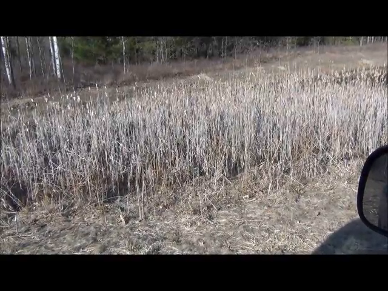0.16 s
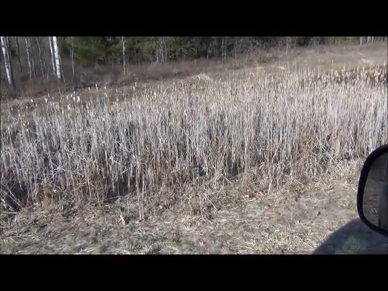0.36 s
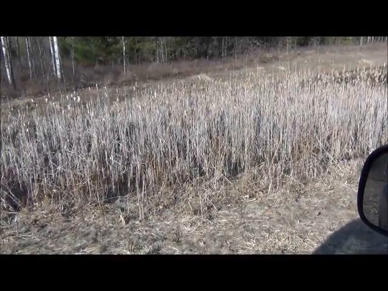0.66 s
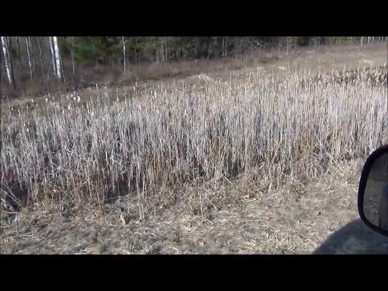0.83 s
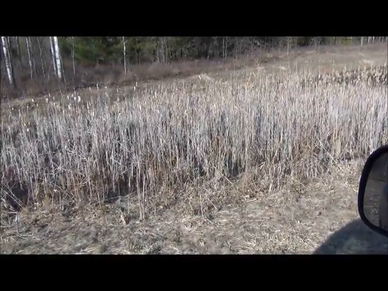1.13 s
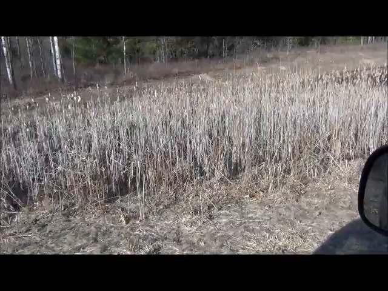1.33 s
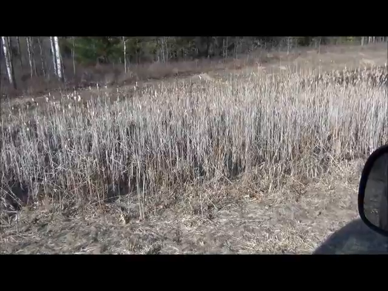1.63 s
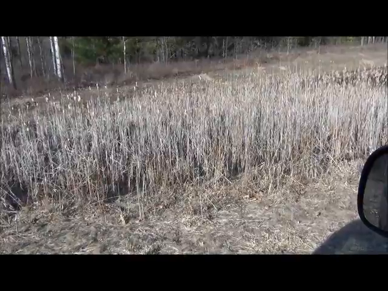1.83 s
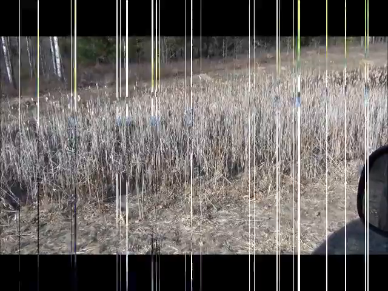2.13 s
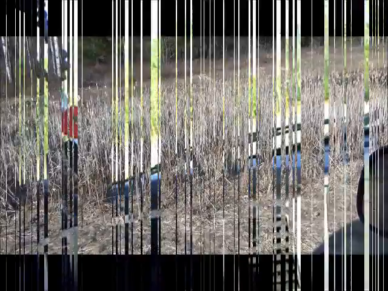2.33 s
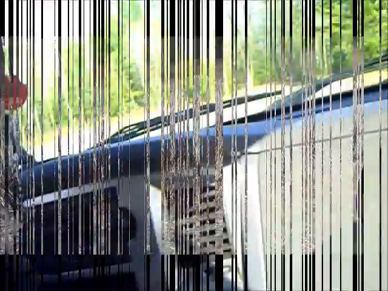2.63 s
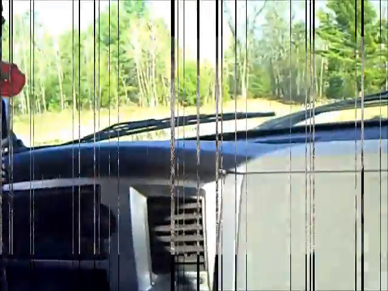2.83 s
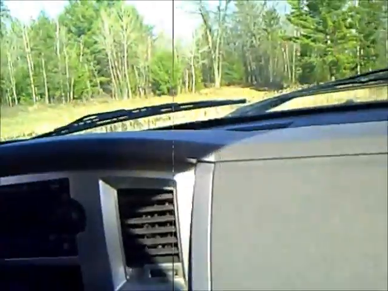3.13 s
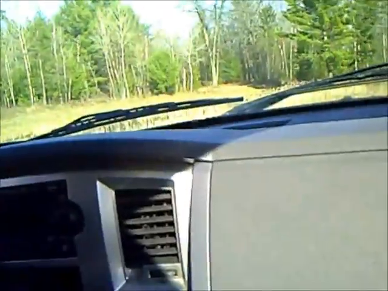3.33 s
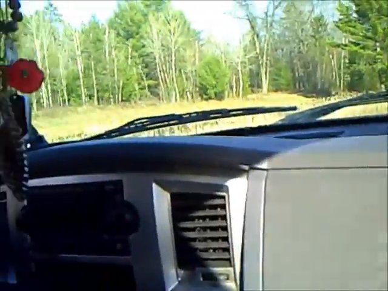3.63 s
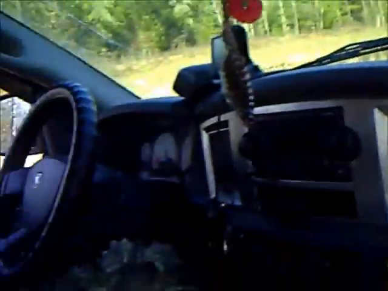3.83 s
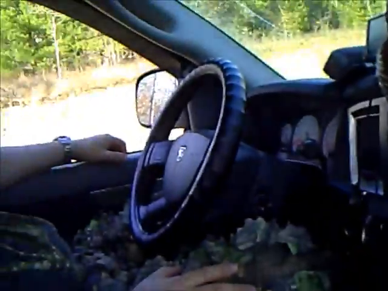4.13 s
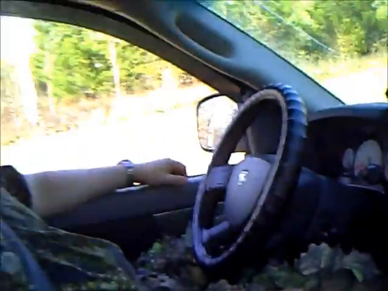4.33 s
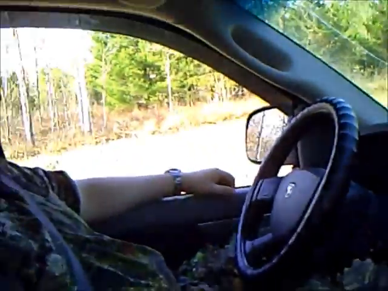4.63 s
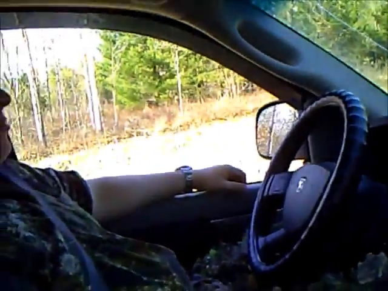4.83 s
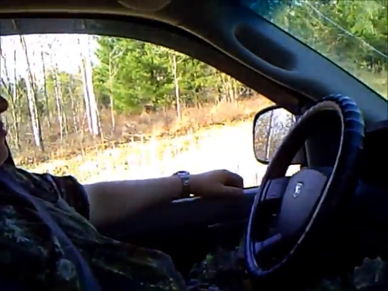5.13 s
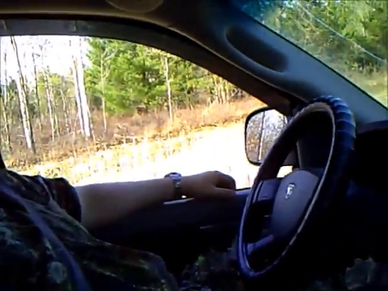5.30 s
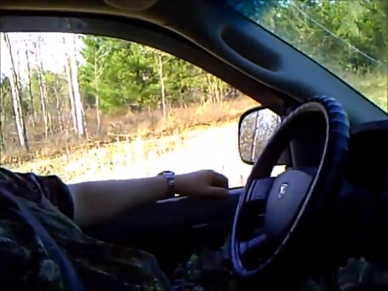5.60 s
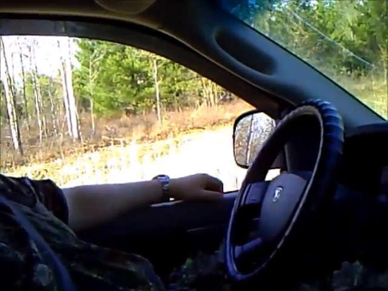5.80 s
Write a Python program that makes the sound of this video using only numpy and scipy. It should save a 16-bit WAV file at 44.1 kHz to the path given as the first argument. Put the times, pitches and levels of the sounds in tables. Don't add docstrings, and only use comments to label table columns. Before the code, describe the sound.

Many small frogs whistle upward and trill, bright and near, with slight reverberation from reeds. A second, duller microphone thumps on midway, adding cloth swish and case knocks under the frogs. A tiny sharp snap precedes a sudden cut; then only distant frogs remain, much quieter, centred and slightly fluttering with brief dropouts, over soft cab rumble, faint knocks and irregular light handling ticks.

```python
import sys
import numpy as np
from scipy import signal
from scipy.fft import rfft, irfft, next_fast_len
from scipy.io import wavfile
from scipy.ndimage import uniform_filter1d

SR = 44100
rng = np.random.default_rng(int(sys.argv[2]) if len(sys.argv) > 2 else 0)


def int16_out(signal):
    q = np.round(np.clip(np.atleast_2d(signal).T, -1, 1) * 32767)
    wavfile.write(sys.argv[1], SR, q.astype(np.int16))


def makeup_ratio(level_db):
    decades = np.asarray(level_db, float) / 20
    return 10 ** decades


N = 262924
CAB_ON, OUTDOOR_OFF = 1.8632, 3.357
BEND = .85
PORTS = np.array([[1], [-1]])

# (multiple of the loudest partial, level [dB])
PEEP_VOICE = [(.5, -32.5), (1, 1.5), (1.5, -31.5), (2, -40.5), (2.5, -50.5), (3, -54.5), (4, -55.5),
              (4.5, -56)]
LOW_VOICE = [(1, 1), (2, -41.5)]
TRILL_VOICE = [(.5, -33), (1, 2), (1.5, -30.5), (2, -41), (2.5, -48.5), (3, -48)]


def noise(points, lo_hz, hi_hz):
    size = next_fast_len(N)
    hz = np.fft.rfftfreq(size, 1 / SR)
    at, db = np.transpose(points)
    shape = makeup_ratio(np.interp(np.log(hz + 1), np.log(at), db)) * (hz > at[0] / 2)
    inside = (hz > lo_hz) & (hz < hi_hz)
    rms = np.sqrt(np.sum(shape[inside] ** 2) / len(hz))
    return irfft(rfft(rng.standard_normal(size)) * shape, size)[:N] / rms


def curve(table, column):
    rows = np.array(table)
    return makeup_ratio(np.interp(np.arange(N) / SR, rows[:, 0], rows[:, column]))


def walk(rate):
    k = int(SR / rate)
    steps = np.repeat(rng.standard_normal(N // k + 1), k)
    return 1.2 * uniform_filter1d(steps, k)[:N]


def add(out, at, sound):
    i = int(at * SR)
    i, sound = max(i, 0), sound[..., max(-i, 0):]
    out[..., i:i + sound.shape[-1]] += sound[..., :max(N - i, 0)]


def whistle(out, at, length, hz0, hz1, db, pan_db, voice, rise=0.006, fall=0.0035, bend=BEND,
            flick_hz=0., hook_hz=0., flutter_db=3.0):
    t = np.arange(int((length + rise) * SR)) / SR
    end = t[-1]
    wobble, start = rng.standard_normal((3, 10)), rng.random()
    flutter, waver, rasp = (np.interp(t, np.linspace(0, end, 10), w) for w in wobble)
    swell = np.clip(np.minimum(t / rise, (end - t) / fall), 0, 1)
    swell = swell * makeup_ratio(flutter_db * flutter - 1.5 * (t / end - .5))
    hz = hz0 + (hz1 - hz0) * (t / end) ** bend + 7 * waver
    hz = hz + flick_hz * np.exp((t - end) / 0.0031) + hook_hz * np.exp(-t / 0.01)
    turns = start + np.cumsum(hz) / SR + PORTS * pan_db * 0.0072
    tone = 0
    for (k, g), tint in zip(voice, rng.standard_normal(8)):
        partial_db = g + (k != 1) * (2.4 * tint + 2.0 * rasp)
        tone = tone + makeup_ratio(partial_db) * np.sin(2 * np.pi * k * turns)
    tick_hz = 1900 + 250 * wobble[0, 0]
    tick = makeup_ratio(-15.0) * np.exp((t - end + fall / 2) / 0.00095) * np.sin(2 * np.pi * tick_hz * t)
    add(out, at - rise / 2, np.sqrt(2) * makeup_ratio(db + PORTS * pan_db / 2) * swell * (tone + tick))


def peeps(frogs, flutter_db):
    out = np.zeros((2, N))
    for (hz, climb, *place), calls in frogs:
        pan_db, bright_db = (*place, 0, 0)[:2]
        low, steep = hz < 2500, climb > 5000
        bend = .55 if hz > 3330 and climb < 6660 else BEND
        voice = LOW_VOICE if low else [(k, db + bright_db * (k > 1)) for k, db in PEEP_VOICE]
        for at, length, db in calls:
            whistle(out, at, length, hz, hz + climb * length, db, pan_db, voice,
                    flick_hz=320 * steep, hook_hz=120 * low, flutter_db=flutter_db, bend=bend)
    return out


def trills():
    # (time [s], notes [count], first gap [s], last gap [s], start [Hz], end [Hz])
    trains = [
        (0.123, 15, .0195, .036, 2400, 2880),
        (1.335, 20, .019, .033, 2505, 2915),
        (3.086, 10, .018, .024, 2580, 2780),
        (.51, 9, 0.018, .028, 2900, 3100),
        (.082, 7, .02, .022, 2690, 2850),
        (2.595, 4, .018, .02, 3130, 3250),
    ]
    # (first level [dB], last level [dB], lateness of slowing [exponent], lateness of climb [exponent])
    shapes = [(-45, -28, 2.2, 1.3), (-46, -35, 1.9, .9), (-42, -39.5, 1.5, .9), (-43, -39.5, 1.5, 1.4),
              (-41, -40, 1.1, 1.1), (-35, -39, 1.1, 1.1)]
    out = np.zeros((2, N))
    for (at, notes, gap0, gap1, hz0, hz1), (db0, db1, slowing, climbing) in zip(trains, shapes):
        for x in np.linspace(0, 1, notes):
            gap = gap0 + (gap1 - gap0) * x ** slowing
            hz = hz0 + (hz1 - hz0) * x ** climbing
            early, weak = rng.standard_normal(2)
            db = db0 + (db1 - db0) * x ** 1.55 + .7 * weak
            whistle(out, at + .0007 * early, .52 * gap, hz - 30, hz + 30, db, 1.2, TRILL_VOICE,
                    rise=0.002964, fall=0.0041)
            at += gap
    return out


def squeaks():
    # (time [s], length [s], start [Hz], end [Hz], level [dB])
    falls = [
        (0.055, 0.039, 1840, 1716, -61.5),
        (0.598, 0.043, 1835, 1743, -60),
        (1.057, 0.039, 1860, 1720, -61),
        (1.736, 0.018, 1840, 1750, -67),
        (2.326, 0.046, 1860, 1740, -61),
        (2.92, 0.047, 1874, 1720, -59),
    ]
    # (multiple of the fundamental, level [dB])
    overtones = [(1, 3.5), (2, 6), (3, -6.5), (4, -5.5), (5, -10.5), (6, -16)]
    out = np.zeros((2, N))
    for row in falls:
        whistle(out, *row, -1.2, overtones, rise=0.0026, fall=0.0058, bend=0.64, flutter_db=2.5)
    return out


def echoes(x, t60, wet_db, spread):
    t = np.arange(int(t60 * SR)) / SR
    mid, side = rng.standard_normal((2, len(t))) * makeup_ratio(-60 * t / t60) * np.clip(t / 0.0042, 0, 1)
    tail = (mid + spread * side * PORTS) / np.sqrt(np.sum(mid ** 2))
    return x + makeup_ratio(wet_db) * signal.fftconvolve(x, tail, axes=1)[:, :N]


def crowd(start, end, hz, spread_hz, wet_db, count):
    out = np.zeros((2, N))
    for u, (a, b, c, d) in zip(rng.random(count), rng.standard_normal((count, 4))):
        pitch = hz + spread_hz * np.tanh(.4 * a)
        whistle(out, start + u * (end - start), 0.0463 * np.exp(0.298 * b), pitch, pitch + 160,
                2.0 * c, 2.1 * d, PEEP_VOICE[:3])
    out = echoes(out, 0.76, wet_db, 0.1)
    return out / np.sqrt(np.mean(out ** 2) * N / SR / (end - start))


# (time [s], level [dB])
CROWD = [
    [(0.0, -27), (.7, -32), (1.2, -34.5), (1.6, -33), (2.1, -35.5), (2.7, -29.5), (3.15, -30.5),
     (3.35, -32)],
    [(3.37, -52.5), (3.67, -60.5), (4.1, -54), (4.54, -50.5), (5.0, -51), (5.4, -51), (5.96, -51)],
]


def breath(near, trilled):
    # (frequency [Hz], level [dB])
    breathy = [(1300, -12), (2000, 6), (3700, -5.5), (4600, -10), (6500, -6), (9500, -8), (11000, -21.5)]
    effort = makeup_ratio(-45.0) * np.abs(near[0]) + makeup_ratio(-54.5) * np.abs(trilled[0]) ** 0.25
    return uniform_filter1d(effort, 120) * noise(breathy, 1300, 11000)


def marsh_air():
    # (frequency [Hz], level [dB])
    outdoor = [(30, -2), (200, -8.5), (700, -8.5), (1500, -17), (2200, -8), (4500, -12), (7000, -26.5),
               (10000, -27), (12000, -25), (16000, -29.5)]
    mid = noise(outdoor, 11700, 14650)
    side = noise([(300, -24.0), (1500, -22.0), (4500, -19.5), (9000, -40.5)], 300, 9000)
    return makeup_ratio(-80.5 + 0.5 * walk(3.8)) * (mid + side * PORTS)


def snap():
    t = np.arange(N) / SR
    shape = [(8000, -13), (10000, -9), (13000, -2.0), (14300, -25), (15500, -23)]
    return makeup_ratio(-44.5 - 60 * np.abs(t - 3.247) / 0.0022) * noise(shape, 8000, 15500)


def marsh():
    deep = [
        ((2610.5, 3901.5, 0.5, -3.5), [(.491, 0.082, -30), (.953, .08, -29.5), (1.19, 0.083, -44), (1.374, .1, -31), (1.836, .08, -29), (2.342, 0.087, -29.5), (2.43, 0.108, -31.5), (2.841, .072, -30.5)]),
        ((2540, 590, -2.4), [(.865, 0.065, -50), (1.065, 0.032, -55.5), (1.135, .04, -61.5), (1.795, 0.044, -56), (2.545, 0.034, -57.5)]),
        ((2752, 3296.5, -3.5, 6.5), [(.733, .115, -45), (3, 0.02, -39), (2.2, 0.015, -47), (2.8, 0.087, -39.5)]),
        ((2715, 3200, 1.6, 1.5), [(1.267, 0.039, -33), (1.71, 0.048, -37.5), (2.625, 0.1, -49.5), (2.913, .07, -36), (3.293, 0.061, -41.5)]),
        ((2778.5, 2700, -1, 2), [(-.01, .045, -29.5), (.615, 0.134, -35.5), (1.112, .05, -47.5), (1.995, .045, -35), (2.955, .04, -37)]),
        ((2652, 2599, -3, 6), [(.745, 0.058, -46), (1.048, 0.045, -43.5), (1.14, 0.046, -56.5), (2.205, 0.03, -52)]),
    ]
    middle = [
        ((2807, 3280, 1.33, 0.73), [(.055, 0.12, -35.5), (.866, 0.08, -30.5), (1.499, 0.06, -31), (1.257, 0.072, -33), (2.165, 0.061, -34), (2.255, 0.027, -32.5), (2.287, 0.051, -37.5), (2.35, .057, -28.5), (2.429, 0.082, -30.5), (3.18, 0.051, -39.5), (3.28, .07, -30)]),
        ((2853, 2402.5, 2.5, 1.5), [(.224, .085, -33.5), (1.3, 0.091, -31), (1.765, 0.0079, -35), (3.7, 0.068, -32), (2.811, .085, -31.5)]),
        ((2850.5, 2701.5, -1, -1), [(.948, 0.071, -33), (2.736, .1, -33), (2.739, 0.069, -40)]),
        ((2885.5, 2427.5, 1.5, -2.5), [(.312, 0.054, -30), (.487, 0.091, -30), (.928, 0.033, -32), (1.35, 0.1, -30.5), (1.946, 0.062, -30), (2.01, .055, -33), (3.005, 0.031, -35)]),
        ((2990, 1900, 0.86, 1.16), [(.18, 0.1, -46), (.605, 0.055, -30.5), (.425, 0.034, -37.5), (1.04, 0.032, -46.5), (1.09, 0.014, -39), (1.165, .03, -47.5), (1.912, 0.027, -32.5), (2.2, 0.055, -46.5), (3.053, 0.07, -34)]),
    ]
    high = [
        ((2760, 5000, 1.3, 1.3), [(1.64, 0.054, -41.5), (1.786, 0.042, -32.5)]),
        ((3110, 1830, 2.5, 1.3), [(-.01, 0.029, -34), (.576, 0.018, -33), (1.84, 0.065, -47), (2.1, 0.073, -50), (.675, 0.033, -37.5), (1.958, 0.052, -38.5), (2.547, 0.075, -37), (2.961, 0.033, -38.5)]),
        ((3095, 5400, 1.8, 2.8), [(.325, 0.058, -43.5), (1.262, 0.055, -40.5), (1.89, 0.061, -38.5), (2.578, 0.07, -40), (3.208, 0.067, -37.5)]),
        ((3390.5, 3401.5, -4, 0.5), [(.242, 0.052, -49.5), (1.11, .047, -49), (1.591, 0.048, -48), (2.07, 0.053, -48), (2.555, 0.043, -48.5), (3.193, 0.034, -47)]),
        ((3230, 4300, 2.3, 9.5), [(0.12, 0.056, -54), (0.58, 0.047, -50), (1.36, 0.039, -40.5), (0.75, .045, -55.5), (.99, 0.028, -51), (1.79, 0.028, -49), (3, .03, -48), (3.175, 0.047, -41.5), (0.96, .025, -53)]),
        ((2105, -100, .5), [(.885, .087, -50.5), (2.083, 0.056, -52), (2.774, 0.055, -50.5), (2.95, 0.11, -59)]),
        ((2150, 280, .5), [(2.478, 0.024, -54), (2.512, 0.03, -55), (2.965, 0.018, -57)]),
    ]
    far = crowd(-.03, OUTDOOR_OFF, 2900, 428.7, -1.2, count=450) * curve(CROWD[0], 1) * makeup_ratio(-10)
    near, trilled = peeps(deep + middle + high, 1.9), trills() + squeaks()
    whistle(near, 0.054, 0.053, 2460, 2375, -43.0, 3.2, TRILL_VOICE)
    calls = near + trilled + far + breath(near, trilled)
    return echoes(calls, 0.97, -13, 0.4) + marsh_air() + snap()


def thump():
    out, t = np.zeros(N), np.arange(SR // 2) / SR
    kick = (1 - np.exp(-t / 0.000084)) * (np.exp(-t / 0.0032) + 0.011 * np.exp(-t / 0.011))
    rebound = 0.019 * np.exp(-t / .2) * (1 - np.exp(-t / .02))
    add(out, CAB_ON, makeup_ratio(-9.5) * (rebound - kick))
    return out


def cloth():
    # (time [s], length [s], treble [dB], low rub [dB])
    brushes = [(1.842, 0.061, -46.5, -47.5), (1.883, 0.077, -59.5, -62), (1.949, 0.15, -61.5, -62.5),
               (2.079, 0.14, -59, -61.5), (2.208, 0.087, -66.5, -72), (2.261, 0.078, -62, -62),
               (2.33, 0.11, -66.5, -63), (2.4, 0.091, -55.5, -59), (2.542, 0.087, -62.5, -61),
               (2.67, 0.11, -60, -60.5), (2.782, 0.27, -72, -67), (3.277, 0.17, -74, -75),
               (3.754, 0.27, -76, -71), (3.992, 0.22, -73, -68.5), (4.336, 0.029, -65.5, -64),
               (4.456, 0.073, -68, -65.5), (4.633, 0.054, -71.5, -68)]
    # (frequency [Hz], level [dB])
    swish_shape = [(1500, -17.5), (3000, 4), (5500, 0.5), (6300, 0), (7800, -4), (9000, -1.5),
                   (10500, -2.5), (11200, -17)]
    strokes = np.zeros((2, N))
    for at, length, treble_db, low_db in brushes:
        t = np.arange(int(length * SR)) / SR
        swell = np.clip(np.minimum(t / 0.02, (length - t) / 0.027), 0, 1)
        add(strokes, at, makeup_ratio(np.array([[treble_db], [low_db]])) * swell)
    swish = strokes[0] * makeup_ratio(-2.5 + 1.8 * walk(120) + .8 * walk(25)) * noise(swish_shape, 6500, 11000)
    fold_shape = [(6500, -23), (7300, -1.5), (8300, -1.0), (9300, -23)]
    fold = strokes[0] * makeup_ratio(-3.5 + 5.4 * walk(14)) * noise(fold_shape, 6500, 9300)
    rub_shape = [(180, -10.0), (330, 1), (600, -14.5), (1150, 4.0), (1700, 0.0), (2600, -5.0), (4000, -46.5)]
    rub = strokes[1] * makeup_ratio(3.3 * walk(40)) * noise(rub_shape, 690, 1350)
    return swish + fold + rub


def cab_air():
    # (frequency [Hz], level [dB])
    rumble = [(25, 1), (120, -10), (400, -18.5), (1000, -22.5), (1800, -26), (2300, -14.5), (4500, -32.5),
              (8000, -32.5), (11000, -36)]
    whine = makeup_ratio(-87) * noise([(8500, -40), (8660, 0), (8740, 0), (8900, -40)], 8000, 9500)
    return makeup_ratio(-67.5 + .8 * walk(8)) * noise(rumble, 21, 11000) + whine


def knocks():
    # (time [s], frequency [Hz], t60 [s], level [dB])
    hits = [
        (2.086, 920, 0.013, -37),
        (2.277, 1115, 0.016, -35.5),
        (2.903, 10300, .006, -70),
        (3.44, 700, 0.027, -50),
        (3.606, 556, 0.027, -60),
        (3.694, 910, 0.022, -58),
        (3.706, 640, 0.051, -48),
        (3.727, 745, 0.077, -53),
        (3.736, 1030, 0.052, -53),
        (3.748, 990, 0.044, -55),
    ]
    out, t = np.zeros(N), np.arange(4000) / SR
    for at, hz, t60, db in hits:
        rattle = 1 + 0.63 * uniform_filter1d(rng.standard_normal(len(t)), 24) * 5
        add(out, at, makeup_ratio(db - 60 * t / t60) * np.sin(2 * np.pi * hz * t) * rattle)
    return out


def creak():
    # (start [s], end [s], frequency [Hz], level [dB])
    start, end, hz, db = (3.225, 3.5, 312, -70.5)
    out, t = np.zeros(N), np.arange(int((end - start) * SR)) / SR
    buzz = sum(makeup_ratio(-1.5 * k) * np.sin(2 * np.pi * (k + 1) * hz * t + k * k) for k in range(4))
    swell = np.clip(np.minimum(t, t[-1] - t) / 0.027, 0, 1)
    add(out, start, makeup_ratio(db + 3 * walk(35)[:len(t)]) * swell * buzz)
    return out


def grip_ticks():
    shifts = [3.449, 3.469, 3.482, 3.565, 3.696, 3.769, 3.97, 4.068, 4.109, 4.13, 4.251, 4.34, 4.37, 4.432,
              4.468, 4.539, 4.599, 4.669, 4.735, 4.803, 4.877, 4.938, 4.983, 5.043, 5.074, 5.138, 5.202,
              5.303, 5.398, 5.539, 5.749, 5.905]
    out, t = np.zeros(N), np.arange(1200) / SR
    for at in shifts:
        grit = 1 + 0.41 * uniform_filter1d(rng.standard_normal(len(t)), 16) * 4
        push = np.exp(-((t - .006) / 0.00071) ** 2)
        overshoot = 0.5 * np.exp(-((t - .0092) / 0.0024) ** 2)
        add(out, at - .006, makeup_ratio(-48.5 + .5 * rng.standard_normal()) * (overshoot - push) * grit)
    return out


def dropouts(x):
    # (centre time [s], length [s])
    gaps = [(3.385, 0.0039), (3.4439, 0.003), (3.4745, 0.0065), (3.5652, 0.0098), (3.567, 0.0027),
            (3.756, 0.0039), (3.778, 0.0068), (3.8218, 0.0053), (3.865, 0.0053), (3.948, 0.0093),
            (4.052, 0.0022), (4.0857, 0.0029), (4.157, 0.0079), (4.286, 0.0071), (4.3782, 0.006),
            (4.387, 0.0073), (4.561, 0.0027), (4.643, 0.0038), (4.779, 0.0037), (4.877, 0.0079),
            (4.892, 0.0047), (4.9054, 0.0028), (4.958, 0.005), (4.986, 0.005), (5.0176, 0.0036),
            (5.046, 0.0041), (5.116, 0.0025), (5.1995, 0.004), (5.2271, 0.0052), (5.349, 0.0046),
            (5.417, 0.0033), (5.433, 0.0022), (5.7226, 0.0025), (5.7633, 0.0026), (5.8445, 0.0064),
            (5.873, 0.003), (5.935, 0.0023)]
    t, gain = np.arange(N) / SR, makeup_ratio(2 * walk(170))
    for at, length in gaps:
        gain = np.where(np.abs(t - at) < length / 2, makeup_ratio(-34), gain)
    band, low = (signal.sosfiltfilt(signal.butter(4, hz, "bandpass", fs=SR, output="sos"), x)
                 for hz in ((2580, 3750), (2300, 2560)))
    return x + (uniform_filter1d(gain, size=40) - 1) * band + (makeup_ratio(2.5 * walk(82)) - 1) * low


def cab_chorus():
    # frogs, each ((start [Hz], climb [Hz/s]), calls (time [s], length [s], level [dB]))
    deep = [
        ((2340, 190), [(3.959, 0.018, -57), (4.016, 0.046, -54.5), (4.41, 0.024, -55), (4.445, 0.014, -59), (4.468, 0.027, -55), (4.873, 0.079, -53.5), (5.446, 0.075, -51)]),
        ((2400, 160), [(4.066, 0.016, -72.5), (4.5, 0.042, -59), (4.962, 0.013, -55.5), (5.516, 0.039, -53), (5.878, 0.13, -58)]),
        ((2240, 1800), [(5.792, 0.088, -58.5)]),
        ((2590, 4050), [(3.61, 0.039, -64.5), (3.781, 0.028, -55), (5.141, 0.066, -55), (5.632, 0.092, -55.5)]),
        ((2710, 3000), [(4.128, 0.026, -59), (4.905, 0.044, -54.5), (4.213, 0.055, -53.5), (4.303, 0.058, -52), (5.256, 0.13, -56.5), (5.777, 0.07, -61)]),
        ((2856, 3330), [(3.39, 0.071, -51), (3.512, 0.048, -55.5), (3.82, 0.021, -58), (4.025, 0.045, -56), (4.572, 0.072, -52.5), (4.809, 0.052, -51), (5.051, 0.046, -51), (5.123, 0.052, -55), (5.231, 0.069, -50.5), (5.485, 0.05, -49), (3.645, 0.028, -57.5), (5.932, 0.048, -50)]),
    ]
    high = [
        ((2800, 1680), [(3.87, 0.047, -62), (4.495, 0.05, -54.5), (5.355, 0.075, -56)]),
        ((2800, 3300), [(4.158, .06, -62), (4.1, 0.08, -46.5), (4.687, 0.091, -55), (5.43, 0.06, -61.5), (5.56, 0.042, -55.5), (5.747, 0.074, -55), (3.951, 0.02, -52.5)]),
        ((3010, 3550), [(3.575, 0.012, -55), (4.01, 0.042, -55.5), (5.888, 0.033, -55.5), (4.29, 0.056, -60), (4.412, 0.045, -50.5), (5.62, 0.11, -59), (5.752, 0.061, -57.5)]),
        ((3020, 3860), [(3.435, 0.045, -51), (3.7, 0.045, -62.5), (4.225, 0.036, -71), (3.963, 0.049, -51), (4.415, 0.086, -52), (4.806, 0.066, -49.5), (5.283, 0.051, -46), (5.355, 0.041, -57.5), (5.66, 0.056, -46.5)]),
        ((3230, 4150), [(3.635, 0.054, -66), (3.9, 0.043, -64.5), (4.16, 0.044, -59.5), (4.42, 0.038, -64), (4.52, 0.08, -64), (4.682, 0.054, -57.5), (5.031, 0.057, -61.5), (5.28, 0.066, -55.5), (5.607, 0.087, -65.5), (5.882, 0.054, -61.5)]),
    ]
    # (time [s], frequency [Hz])
    pips = [
        (4.98, 1690),
        (5.046, 1820),
        (5.195, 2070),
        (5.383, 2430),
        (5.463, 1734),
        (5.574, 1810),
        (5.69, 2080),
        (5.879, 1760),
    ]
    indoors = np.arange(N) / SR > OUTDOOR_OFF
    low = peeps(deep[:3], 2.0)
    rasp_shape = [(1500, -50), (1900, -7), (2200, 6), (2450, 5.5), (2650, -9), (3000, -60)]
    low = low + makeup_ratio(-13) * uniform_filter1d(np.abs(low), size=900) * noise(rasp_shape, 1700, 3500)
    level = curve(CROWD[1], 1) * indoors
    far = crowd(3.3, N / SR, 2970, 521.0, 0.5, count=400) * level * makeup_ratio(-7)
    heard = low + peeps(deep[3:] + high, 2.1) + far
    for at, hz in pips:
        whistle(heard, at, 0.014, hz, hz, -70.0 + 9 * (hz > 2300), 0, LOW_VOICE)
    wash_shape = [(2450, -23.0), (2700, 0.0), (3550, -5), (3750, -34.5)]
    heard += makeup_ratio(-10.0) * level * noise(wash_shape, 2450, 3700)
    return echoes(heard, 0.24, -11.5, 0)[0]


def scene():
    t = np.arange(N) / SR
    outdoors = marsh() * np.clip((OUTDOOR_OFF - t) / 0.0012, 0, 1)
    handling = thump() + knocks() + creak() + grip_ticks()
    cab = dropouts(cab_chorus()) + (cloth() + cab_air()) * (t > CAB_ON) + handling
    dull = signal.sosfiltfilt(signal.ellip(8, .2, 60, 11100, fs=SR, output="sos"), cab)
    return outdoors + dull


def band_limit(x):
    return signal.sosfilt(signal.butter(12, 15720, fs=SR, output="sos"), x)


def record(dry):
    return band_limit(dry)


dry = scene()
out = record(dry)
int16_out(out)
```